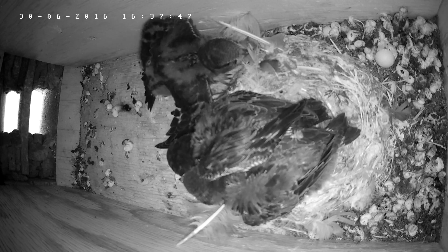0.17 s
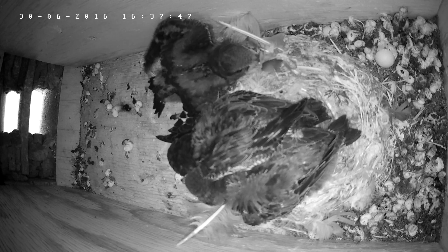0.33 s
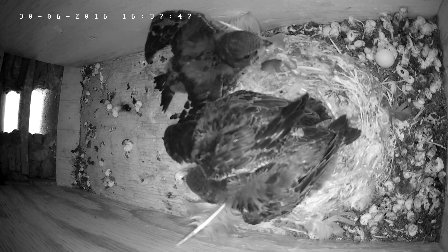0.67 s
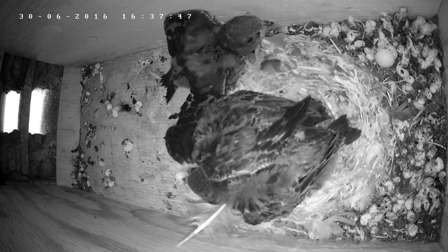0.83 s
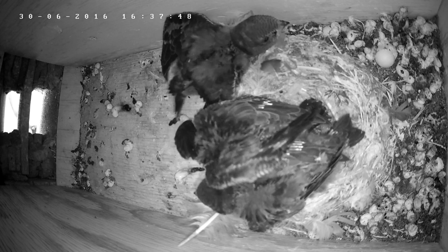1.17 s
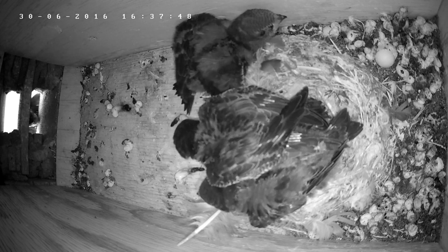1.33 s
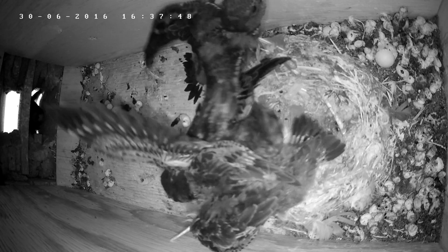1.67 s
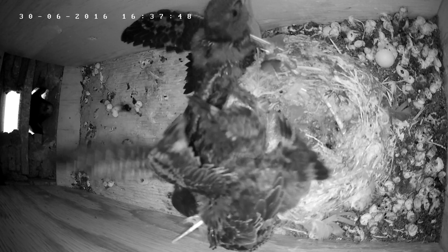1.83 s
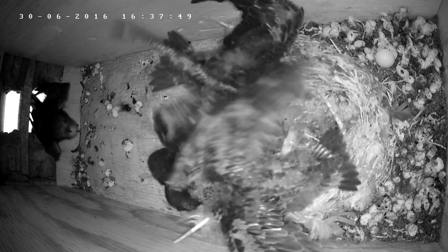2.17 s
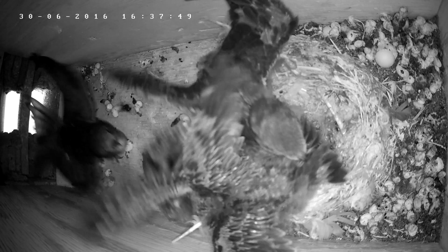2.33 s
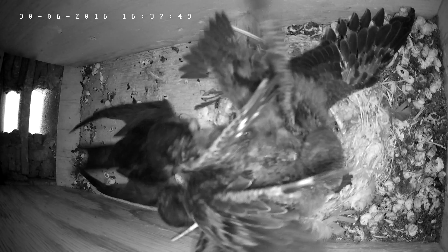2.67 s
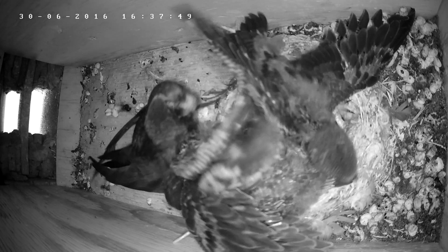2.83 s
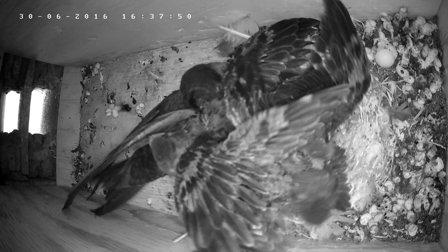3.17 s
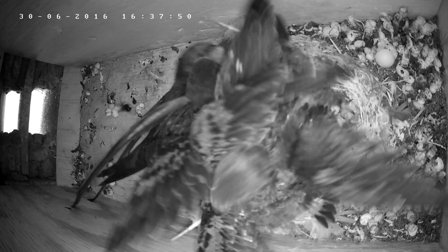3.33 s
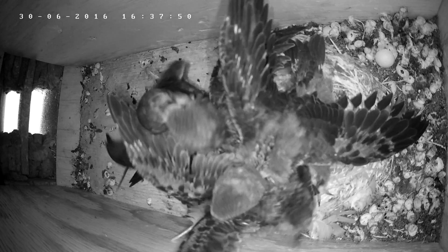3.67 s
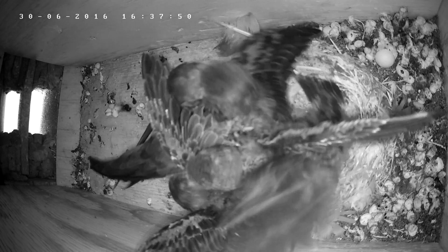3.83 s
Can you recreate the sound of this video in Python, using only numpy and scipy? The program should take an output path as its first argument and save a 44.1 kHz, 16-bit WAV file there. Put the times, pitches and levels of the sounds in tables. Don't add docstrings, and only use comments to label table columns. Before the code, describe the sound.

Wings of birds scrambling in a small wooden nest box. Until 1.25 s, faint straw shuffles, claw ticks and soft thumps over light hiss. At 1.28 s a heavy, overloaded low boom as an adult lands. Thumps and wing brushes build from 1.5 s; loud, woody slaps crowd 2.0-2.7 s, with a tiny faint peep near 2.2 s. Quieter irregular flaps, rustle and hollow thumps continue to 4 s. Close, boxy, gritty microphone.

```python
import sys
import numpy as np
from scipy import signal
from scipy.fft import rfft, irfft, next_fast_len
from scipy.io import wavfile
from scipy.ndimage import uniform_filter1d, map_coordinates

SR = 44100
rng = np.random.default_rng(int(sys.argv[2]) if len(sys.argv) > 2 else 0)


def natural_amplitude(level_db):
    exponent = np.asarray(level_db, float) / 20
    return 10 ** exponent


def put_to_file(sound):
    columns = np.atleast_2d(sound).T
    safe = np.clip(columns, -1, 1)
    whole_steps = np.round(safe * 32767)
    wavfile.write(sys.argv[1], SR, whole_steps.astype(np.int16))


N = 176400
RATE_HZ = 8000
LID_HZ, LID_WIDTH_HZ = 1192, 22


def unit(x):
    return x / np.sqrt(np.mean(x ** 2) + 1e-20)


def peak_unit(x):
    return x / np.abs(x).max()


def add_at(out, time_s, sound):
    out[round(time_s * SR):][:len(sound)] += sound


def along(points, hz):
    f, v = np.transpose(points)
    return np.interp(np.log(hz + 1), np.log(f + 1), v)


def wobble(rate):
    knots = rng.standard_normal(int(N * rate / SR) + 4)
    return 2 * np.tanh(.5 * map_coordinates(knots, [np.arange(N) * rate / SR]))


def filtered(x, response):
    m = next_fast_len(len(x) + SR // 2)
    return irfft(rfft(x, m) * response(np.fft.rfftfreq(m, 1 / SR)), m)[:len(x)]


def modes(table, spread_db=0):
    luck = rng.standard_normal(len(table))

    def response(f):
        total = 0
        for k, (centre, width, db) in enumerate(table):
            gain = (-1) ** k * natural_amplitude(db + spread_db * luck[k])
            total = total + gain * 1j * f * width / (centre * centre - f * f + 1j * f * width)
        return total
    return response


def soft(response):
    SOFT_HZ = 470
    return lambda f: response(f) / (1 + 1j * f / SOFT_HZ) ** 2


def patchy(x, depth_db):
    z = signal.stft(x, nperseg=512)[2]
    field = uniform_filter1d(rng.standard_normal(z.shape), size=4, axis=0)
    field = uniform_filter1d(field, size=5, axis=1)
    return signal.istft(z * natural_amplitude(depth_db * unit(field)), nperseg=512)[1][:N]


# (frequency [Hz], width [Hz], level [dB])
HOLLOW = [(81.3, 46, 8), (110.2, 34.5, 11), (164.2, 61, 12.5), (187.4, 97, 2), (296, 38.5, 4.5),
          (346.6, 27, -3.5)]


def hollow(spread_db=0):
    return modes(HOLLOW, spread_db)


# (frequency [Hz], width [Hz], level [dB])
WALLS = [(511.4, 49, -5), (668.3, 15.5, 0.5), (731.4, 25, -1.5), (926, 52, -3), (995, 9.7, 0),
         (1454, 22, -1.5), (1529, 40, -1.5), (1718, 134, -5), (1867.5, 39.6, -6.5), (2124, 66, -7.5),
         (2660, 60, -16.5), (2985, 128, -13), (3363, 120, -19.5), (3565, 72, -18)]
# (frequency [Hz], level [dB])
BETWEEN = [(200, -27), (600, -15.5), (1500, -13), (2500, -19), (3900, -35)]


def box(x, lid_db, spread_db, tilt, spot_hz=LID_HZ, spot_db=0):
    SPOT_OCTAVES = 0.12
    walls = modes(WALLS, spread_db)
    lid = modes([(LID_HZ, LID_WIDTH_HZ, lid_db)])

    def response(f):
        octaves = np.log2((f + 1) / spot_hz)
        spot = natural_amplitude(spot_db * np.exp(-(octaves / SPOT_OCTAVES) ** 2))
        wood = (walls(f) + natural_amplitude(along(BETWEEN, f))) * spot
        hardness = (np.clip(f, 300, RATE_HZ / 2) / LID_HZ) ** tilt
        return (wood + lid(f)) * hardness
    return filtered(x, response)


# (time [s], rustle level [dB], rumble level [dB])
SCRAMBLE = [(0, -46.5, -43), (.39, -56, -46), (0.999, -52, -46.5), (1.251, -45, -37), (1.45, -42, -39.5),
            (1.729, -40, -33), (2.259, -32, -29), (2.551, -33.5, -28.5), (2.801, -36, -34),
            (3.087, -38, -37.5), (3.44, -34, -30), (4, -40.5, -39)]


def scramble():
    s, rustle_db, rumble_db = np.transpose(SCRAMBLE)
    t = np.arange(N) / SR
    clumps = natural_amplitude(3 * wobble(25) + 3 * wobble(70) + 4 * wobble(500))
    straw = patchy(clumps * rng.standard_normal(N), depth_db=2.0)
    rustle = unit(box(straw, 0.88, 0, tilt=-0.2))

    lumps = natural_amplitude(1.5 * wobble(14) + 2.5 * wobble(50))
    cavity = hollow()
    with_wind = soft(lambda f: cavity(f) + natural_amplitude(-11) / (1 + (f / 60) ** 2))
    rumble = unit(filtered(lumps * rng.standard_normal(N), with_wind))
    rustle_gain = natural_amplitude(np.interp(t, s, rustle_db) - 0.5)
    rumble_gain = natural_amplitude(np.interp(t, s, rumble_db) + 1.5)
    return rustle_gain * rustle + rumble_gain * rumble


def peep():
    START_S, LENGTH_S, PITCH_HZ, LEVEL_DB = 2.193, .047, 3620, -43
    u = np.clip((np.arange(N) / SR - START_S) / LENGTH_S, 0, 1)
    hz = PITCH_HZ + 150 * np.exp(-((u - .4) / 0.15) ** 2)
    swell = np.sqrt(np.abs(np.sin(np.pi * u)))
    dip = 1 - 0.49 * np.exp(-((u - .35) / 0.059) ** 2)
    return natural_amplitude(LEVEL_DB) * swell * dip * np.sin(2 * np.pi * np.cumsum(hz) / SR)


def brush(length_s, lid_ring_db, spot_hz=LID_HZ, spot_db=0):
    ATTACK, GRAIN_DB, LID_DB, COLOUR_DB, TILT = 0.15, 2.5, 4, 2.5, 0.47
    t = np.arange(SR // 5) / SR
    u = t / max(length_s, .003)
    grain = uniform_filter1d(rng.standard_normal(len(t)), size=60) * np.sqrt(60)
    envelope = (1 - np.exp(-u / ATTACK)) * np.exp(-u ** 2)
    force = envelope * natural_amplitude(GRAIN_DB * grain) * rng.standard_normal(len(t))
    return peak_unit(box(force, LID_DB + lid_ring_db, COLOUR_DB, TILT, spot_hz, spot_db))


# (time [s], peak level [dB], length [s], lid ring [dB])
SHUFFLES = [(0.057, -25.5, 0.02, 10.5), (0.085, -26, 0.0061, -1.5), (0.211, -32, 0.018, -5),
            (0.247, -29, 0.045, 0.5), (0.272, -30.5, 0.045, 10.5), (0.293, -30, 0.01, -10),
            (0.51, -37, 0.027, 4.5), (0.559, -40.5, 0.011, 10), (0.577, -35, 0.039, 7.5),
            (0.673, -27, 0.057, -4), (0.689, -32, 0.027, -6), (0.751, -34, 0.033, 2),
            (0.796, -42, 0.026, 21), (0.879, -37, 0.0054, 37.5), (1.039, -37.5, 0.026, 12),
            (1.214, -36, 0.018, 11), (1.362, -34.5, 0.016, 19.5)]


def shuffles():
    out = np.zeros(N + SR)
    for s, db, length_s, lid_ring_db in SHUFFLES:
        add_at(out, s, natural_amplitude(db) * brush(length_s, lid_ring_db))
    return out[:N]


# (time [s], peak level [dB])
TICKS = [(.0645, -35), (.244, -31), (.447, -41.5), (.805, -30.5), (1.121, -28.5), (1.266, -32.5),
         (1.281, -15.5), (1.623, -29.5), (1.665, -33), (1.851, -27), (2.004, -26), (2.218, -39),
         (2.244, -6.5), (2.707, -24.5), (2.767, -19.5), (2.969, -26.5), (3.425, -31), (3.489, -28),
         (3.835, -22)]


def claws():
    TICK_S = .003
    out, t = np.zeros(N + SR), np.arange(SR // 5) / SR
    for s, db in TICKS:
        force = np.exp(-t / TICK_S) * rng.standard_normal(len(t))
        add_at(out, s, natural_amplitude(db) * peak_unit(box(force, -0.91, 0.74, tilt=1)))
    return out[:N]


# (time [s], peak level [dB], pitch [Hz], decay time t60 [s])
THUMPS = [(0.287, -24.5, 163, 0.08), (0.52, -35, 159, 0.34), (0.669, -34.5, 145, 0.18),
          (1.046, -27, 157.3, 0.14), (1.344, -23, 140, 0.22), (1.524, -20, 156.3, 0.14),
          (1.602, -17.5, 179.6, 0.14), (1.654, -20.5, 161, 0.12), (1.754, -16.5, 148, 0.11),
          (1.832, -11, 135.6, 0.14), (2.142, -15, 140, 0.11), (2.246, -15.5, 99.6, 0.14),
          (2.626, -18.5, 88.7, 0.12), (2.709, -24, 172, 0.095), (3.006, -17, 92, 0.23),
          (3.051, -17, 118.7, 0.17), (3.212, -22, 124.6, 0.2), (3.39, -13.5, 153, 0.18),
          (3.538, -13.5, 181.5, 0.12), (3.586, -14.5, 155, 0.09), (3.702, -23, 178, 0.21),
          (3.937, -20, 148.5, 0.14)]
# (time [s], peak level [dB], pitch [Hz], decay time t60 [s])
KNOCKS = [(1.571, -23, 661, 0.14), (1.666, -22.5, 514, 0.063), (1.748, -22, 282, 0.1),
          (1.821, -20.5, 306, 0.086), (1.92, -16.5, 308, 0.062), (2.118, -17.5, 284.6, 0.075),
          (2.241, -25.5, 708, 0.12), (2.347, -32, 668, 0.049), (2.438, -16.5, 300, 0.21),
          (2.505, -30, 307, 0.22), (2.637, -20, 314, 0.15), (3.015, -16, 310, 0.099),
          (3.049, -28.5, 665, 0.16), (3.111, -24, 304, 0.19), (3.195, -23.5, 334, 0.15),
          (3.215, -21.5, 469, 0.11), (3.389, -19.5, 293, 0.13), (3.54, -16, 340, 0.17),
          (3.747, -24.5, 663, 0.058), (3.887, -29, 315, 0.19)]


def thumps():
    LAG_S, PUSH_S, SHAKE = -0.0022, 0.0038, .5
    out, t = np.zeros(N + SR), np.arange(SR // 3) / SR
    for s, db, hz, t60 in THUMPS + KNOCKS:
        decay = natural_amplitude(-60 * t / max(t60, .03))
        ring = np.sin(2 * np.pi * hz * t) * decay * (1 - np.exp(-t / 0.003))
        push = t * np.exp(-t / PUSH_S) * rng.standard_normal(len(t))
        shake = filtered(push, soft(hollow(8.1)))
        both = peak_unit(ring) + SHAKE * peak_unit(shake)
        add_at(out, s + LAG_S, natural_amplitude(db - 3.5) * both)
    return out[:N]


def landing():
    LAND_S, FLOOR_HZ, FLOOR_DB, FLOOR_T60_S = 1.2795, 141, 2.5, 0.092
    HEAVE_DB, HEAVE_S, RATTLE_DB, RATTLE_S = -19, 0.015, -27, 0.013
    t = np.arange(N) / SR - LAND_S
    heave = natural_amplitude(HEAVE_DB) * np.exp(-(t / HEAVE_S) ** 2) * np.cos(2 * np.pi * 45 * t)
    rough = natural_amplitude(5 * wobble(300)) * rng.standard_normal(N)
    rattle = unit(box(rough, -8.5, 2, tilt=-1.1)) * np.exp(-((t - .008) / RATTLE_S) ** 2)
    after = np.maximum(t, 0)
    floor = np.sin(2 * np.pi * FLOOR_HZ * after) * natural_amplitude(FLOOR_DB - 60 * after / FLOOR_T60_S)
    return heave + natural_amplitude(RATTLE_DB) * rattle + floor


# (time [s], peak level [dB], length [s], lid ring [dB], struck spot [Hz])
SLAPS = [(1.469, -32.5, 0.046, 3.5, 990), (1.51, -29.5, 0.03, 8, 1217), (1.574, -14, 0.011, 18, 1090),
         (1.593, -28.5, 0.039, -5, 937), (1.613, -24.5, 0.026, 8.5, 997), (1.667, -30.5, 0.0083, 16.5, 690),
         (1.736, -49, 0.011, 12.5, 1180), (1.758, -23.5, 0.026, 7, 1090), (1.794, -28.5, 0.029, 9.5, 915),
         (1.833, -20.5, 0.031, 7, 938), (1.851, -15, 0.017, -0.5, 1170), (1.877, -21, 0.016, 10, 1130),
         (1.919, -24.5, 0.024, 8.5, 680), (1.964, -24, 0.018, 17.5, 1150), (2.027, -6.5, 0.012, 7, 1157),
         (2.073, -14, 0.018, 5.5, 2020), (2.091, -23.5, 0.01, -6, 940), (2.12, -14.5, 0.013, 1, 1950),
         (2.152, -3.5, 0.0087, 8, 1500), (2.177, -16, 0.012, 4.5, 1185), (2.245, -9, 0.017, 7.5, 1190),
         (2.286, -9, 0.02, 8, 1226), (2.345, -1.5, 0.027, 0.5, 1527), (2.356, -13, 0.008, 4, 1636),
         (2.392, -4.5, 0.0053, 10, 1524), (2.415, -20.5, 0.029, -1, 1455), (2.442, -8, 0.019, -3.5, 782),
         (2.474, -21, 0.016, 4.5, 1247), (2.529, -34.5, 0.016, 8, 1240), (2.577, -12, 0.0096, 3.5, 1480),
         (2.603, -23, 0.0097, 10.5, 1480), (2.631, -20.5, 0.018, 11, 660), (2.666, -17.5, 0.018, 2, 1134),
         (2.696, -16, 0.016, -3, 1465), (2.708, -9.5, 0.013, 0.5, 1460),
         (2.763, -19.5, 0.026, 3, 1410), (2.802, -16.5, 0.017, 3, 1736), (2.823, -29, 0.018, 10, 1126),
         (2.864, -16.5, 0.019, -8.5, 1560), (2.867, -14, 0.02, 5.5, 1217), (2.913, -18, 0.0098, 2, 665),
         (2.955, -23, 0.022, 5, 1136), (3.014, -32.5, 0.016, -5.5, 1150), (3.045, -13, 0.011, 9, 1234),
         (3.05, -14, 0.011, -14.5, 1544), (3.104, -28.5, 0.018, 3.5, 1007),
         (3.141, -22.5, 0.016, 9.5, 1230), (3.209, -21, 0.021, -1, 1550), (3.258, -14.5, 0.021, 6.5, 1185),
         (3.337, -33, 0.0053, 8.5, 1140), (3.38, -24.5, 0.016, 0, 1108), (3.459, -23.5, 0.013, 2, 1175),
         (3.49, -16.5, 0.01, 6, 1560), (3.54, -25.5, 0.0053, 8.5, 1540), (3.57, -23.5, 0.013, 10, 1490),
         (3.6, -26, 0.037, -4, 1540), (3.628, -16.5, 0.011, 6, 1624), (3.687, -31.5, 0.011, 1.5, 1230),
         (3.751, -24.5, 0.016, 7, 668), (3.776, -31, 0.023, 6.5, 1560), (3.833, -30.5, 0.027, 1, 1530),
         (3.877, -12.5, 0.018, -0.5, 1534), (3.891, -24, 0.024, 4, 1130), (3.927, -21.5, 0.013, 2.5, 1570),
         (3.976, -28.5, 0.016, 4.5, 1550)]


def wings():
    LEAD_S, SPOT_DB = .004, 10
    out = np.zeros(N + SR)
    for s, db, length_s, lid_ring_db, spot_hz in SLAPS:
        add_at(out, s - LEAD_S, natural_amplitude(db) * brush(length_s, lid_ring_db, spot_hz, SPOT_DB))
    return out[:N]


def scene():
    return (scramble() + peep() + shuffles() + claws() + thumps() + landing() + wings())[None]


def overload(x):
    CEILING, HARDNESS = .5, 12
    return x / (1 + np.abs(x / CEILING) ** HARDNESS) ** (1 / HARDNESS)


# (frequency [Hz], level [dB])
BASE = [(2500, 0), (4000, -4)]
# (frequency [Hz], level [dB])
MIRROR = [(4000, -3.5), (6000, -13.5), (6800, -25), (7400, -35.5), (7900, -85)]


def low_rate(x):
    base = filtered(x, lambda f: f < RATE_HZ / 2)
    mirror = 2 * base * np.cos(2 * np.pi * RATE_HZ * np.arange(N) / SR)
    kept = filtered(base, lambda f: natural_amplitude(along(BASE, f)))
    leaked = filtered(mirror, lambda f: natural_amplitude(along(MIRROR, f)) * (f < RATE_HZ))
    return kept + leaked


def top_cut(x):
    return signal.sosfilt(signal.butter(12, 7910, fs=SR, output="sos"), x)


def record(dry):
    HISS_DB = -54
    x = dry[0] + natural_amplitude(HISS_DB) * rng.standard_normal(N)
    mix = low_rate(overload(x))[None]
    return top_cut(mix)


dry = scene()
out = record(dry)
put_to_file(out)
```